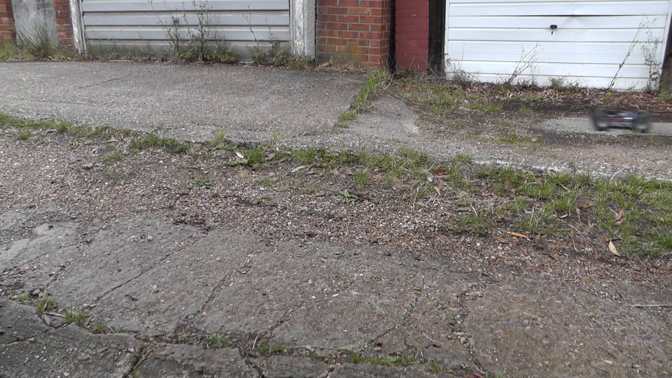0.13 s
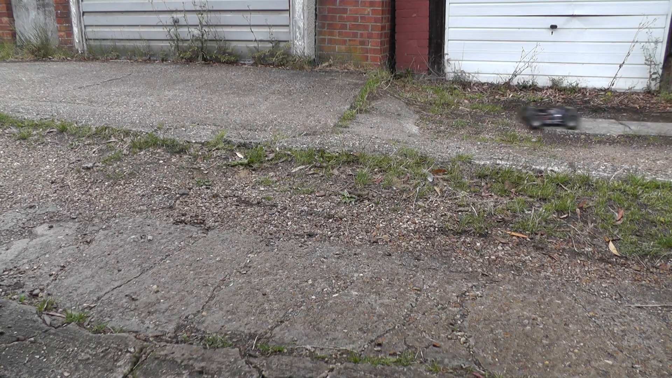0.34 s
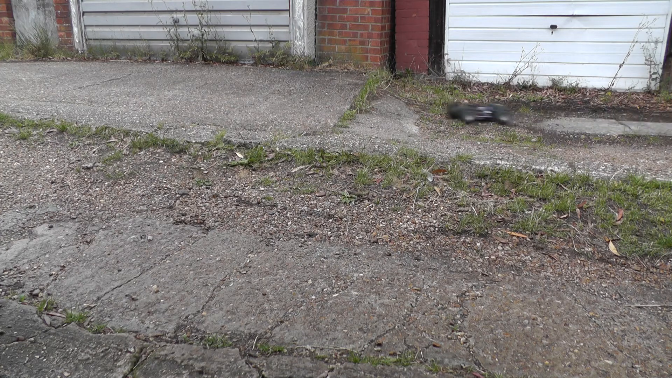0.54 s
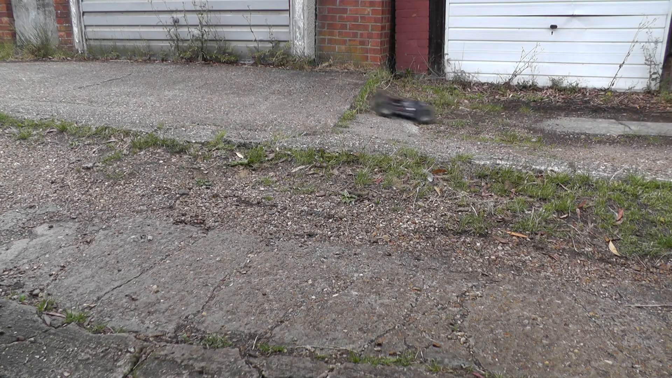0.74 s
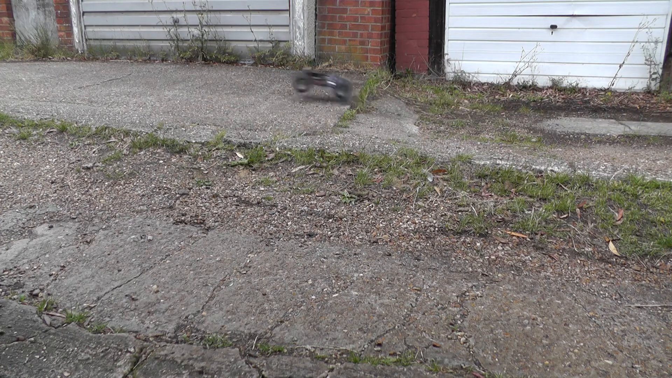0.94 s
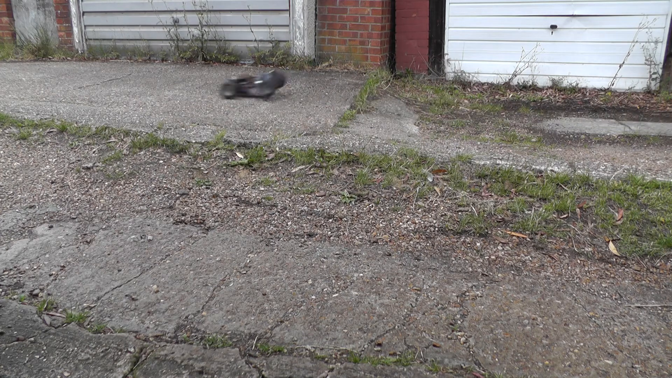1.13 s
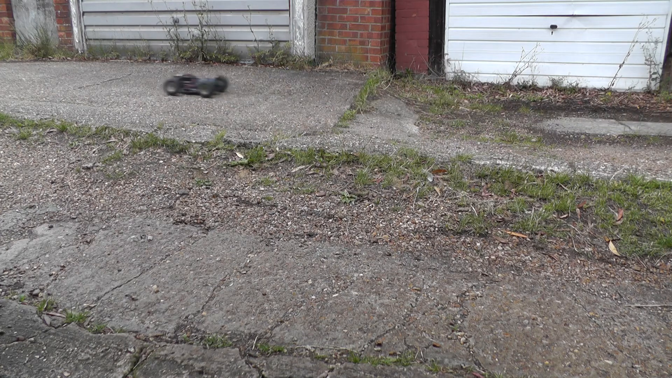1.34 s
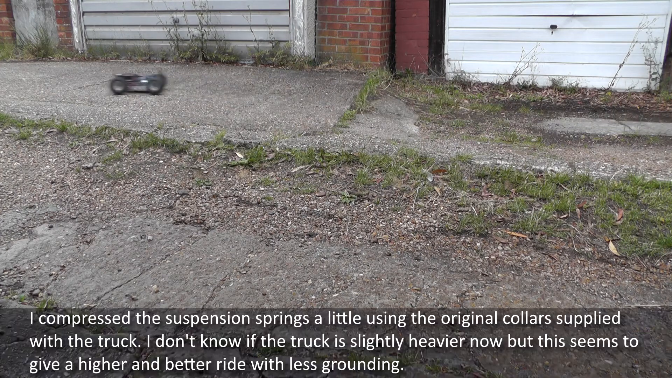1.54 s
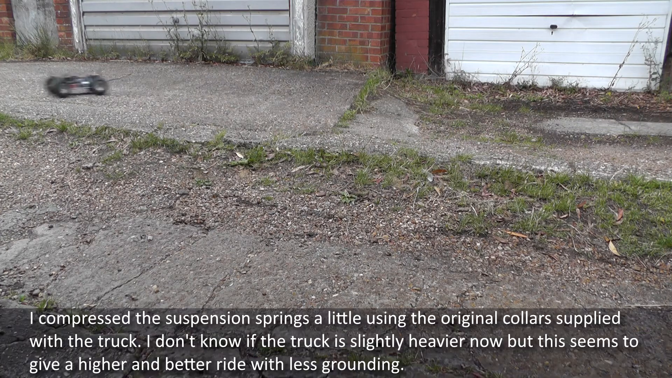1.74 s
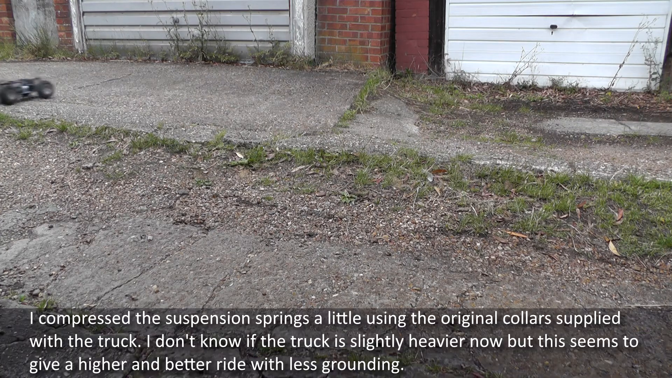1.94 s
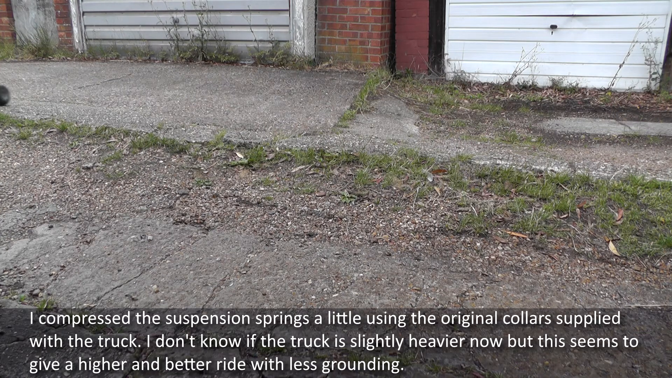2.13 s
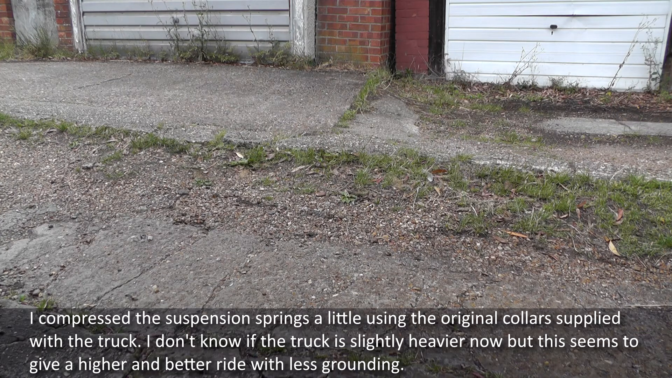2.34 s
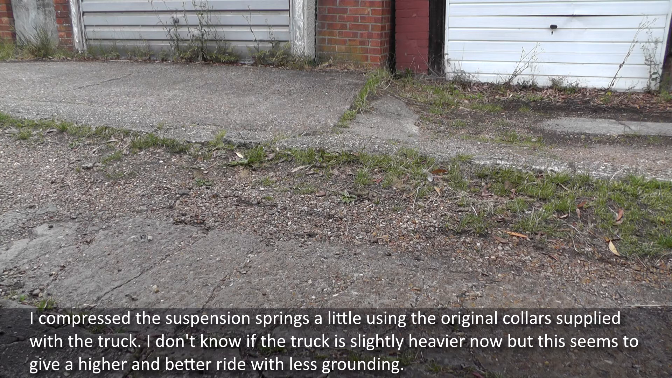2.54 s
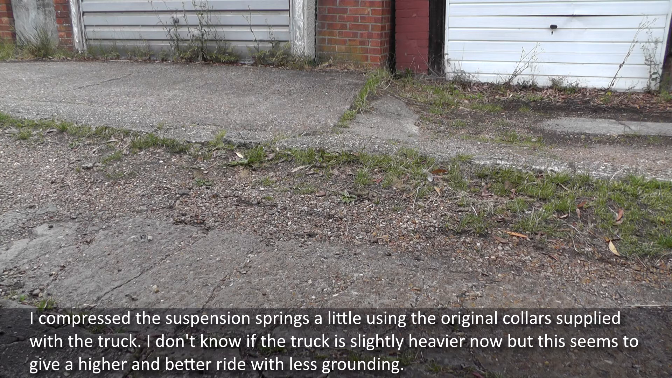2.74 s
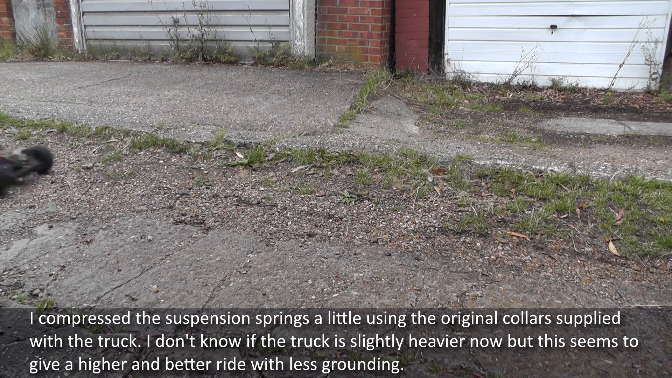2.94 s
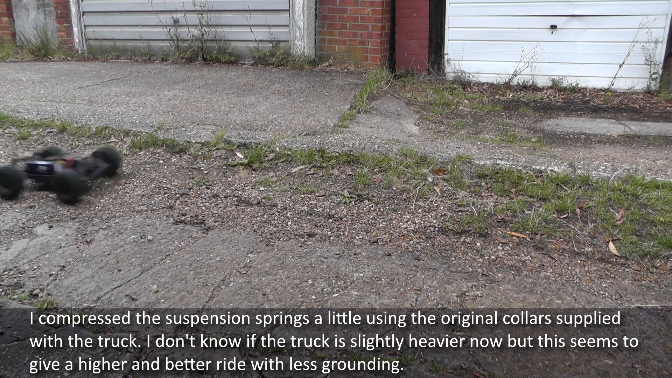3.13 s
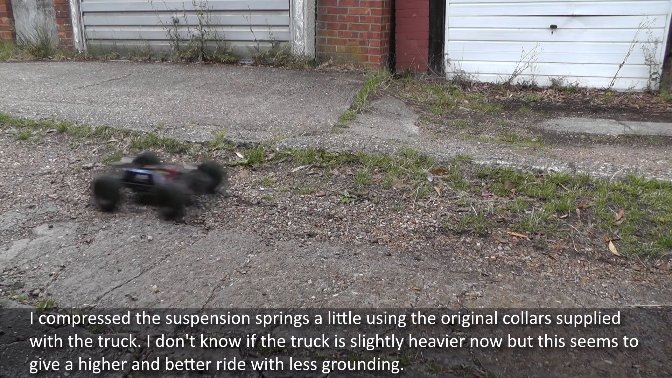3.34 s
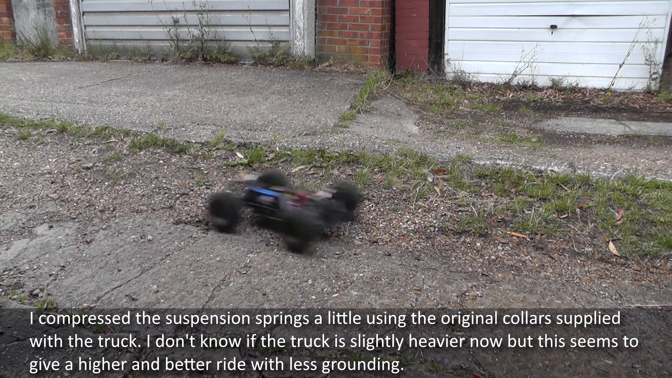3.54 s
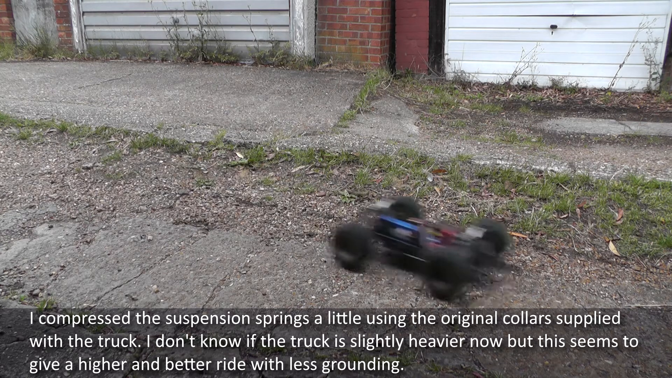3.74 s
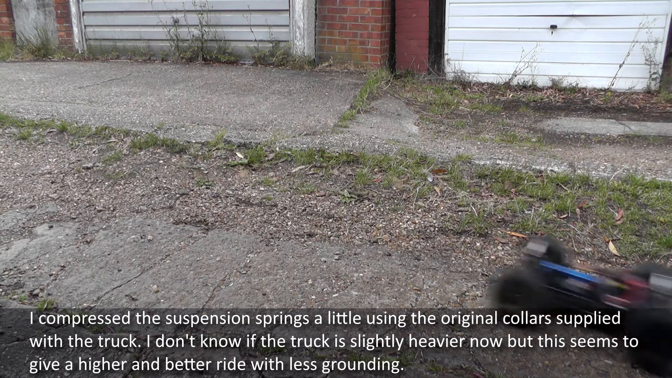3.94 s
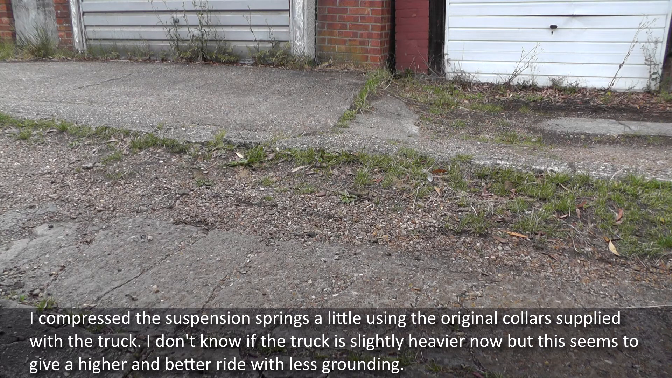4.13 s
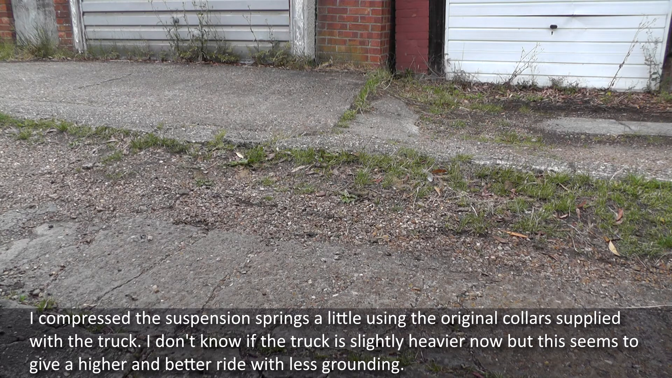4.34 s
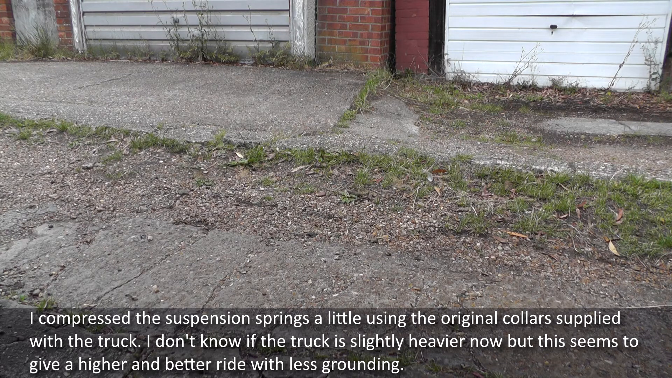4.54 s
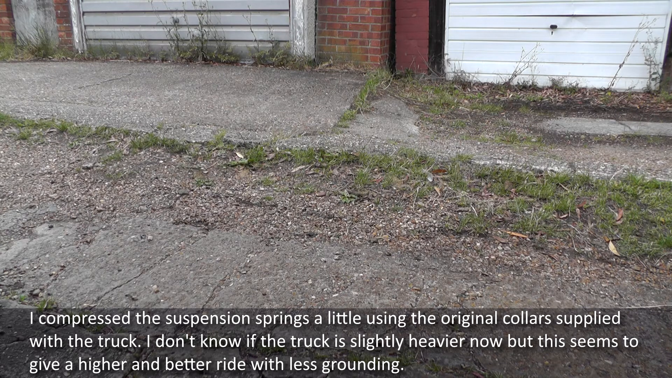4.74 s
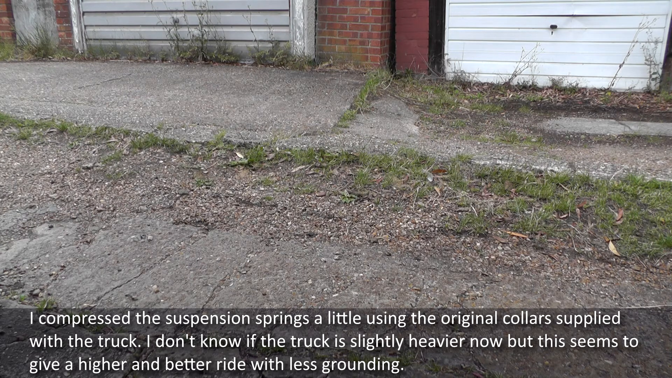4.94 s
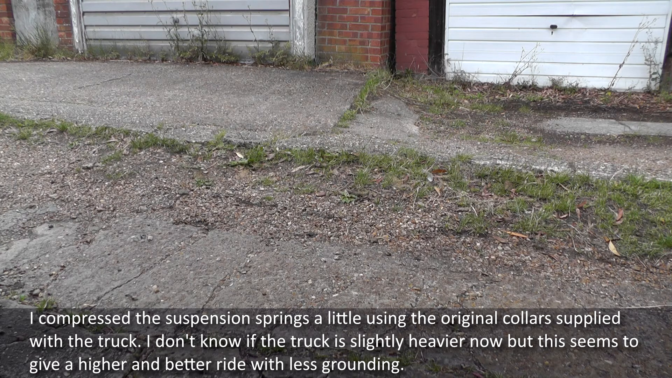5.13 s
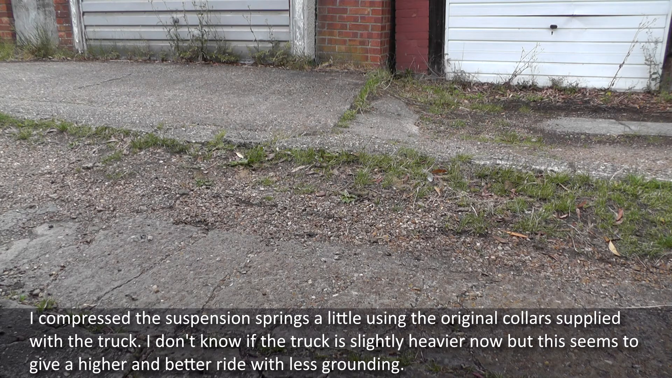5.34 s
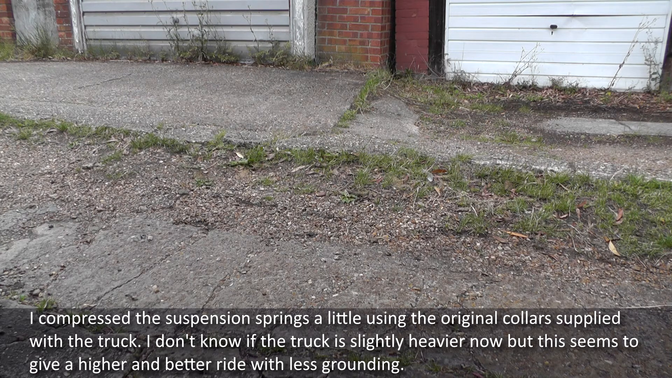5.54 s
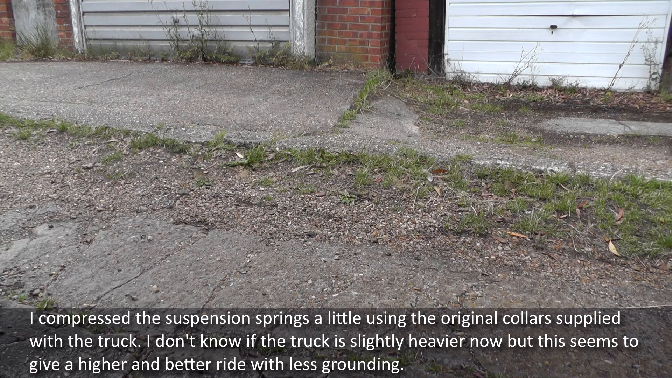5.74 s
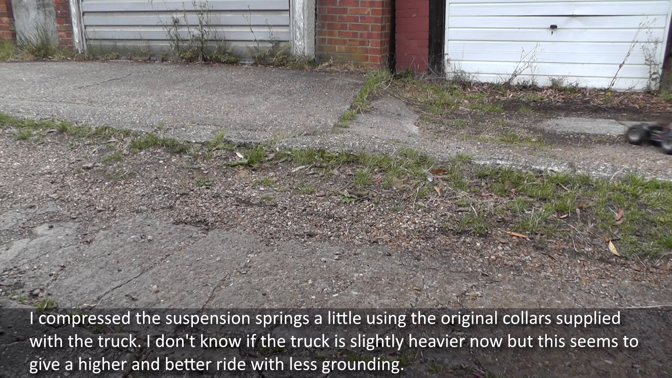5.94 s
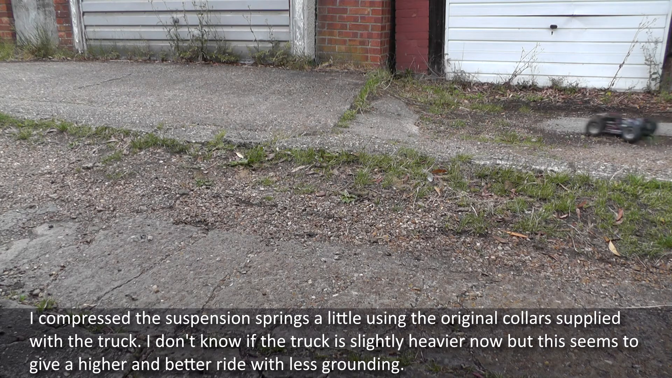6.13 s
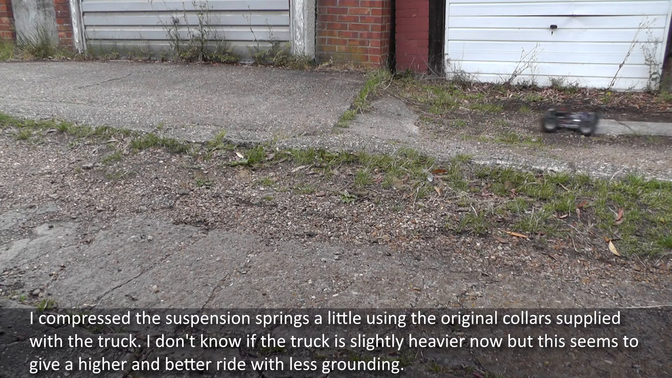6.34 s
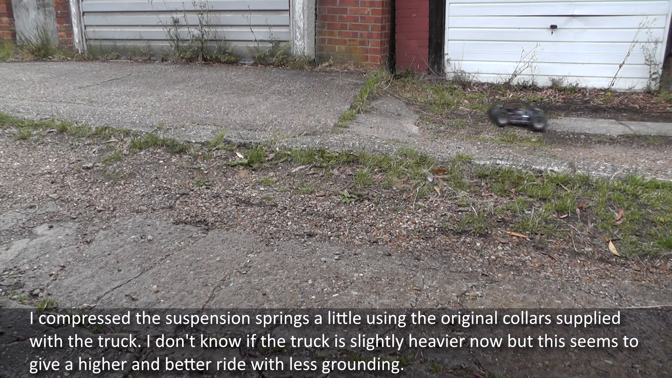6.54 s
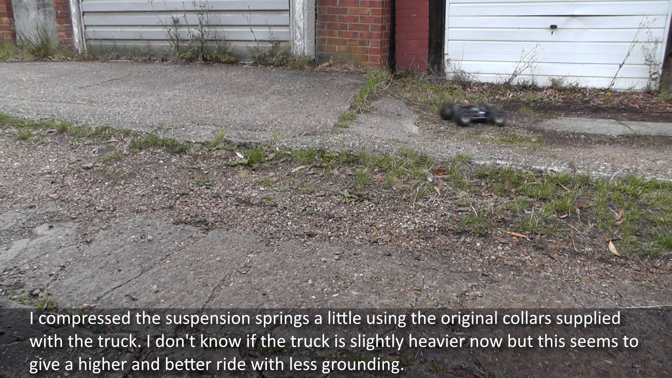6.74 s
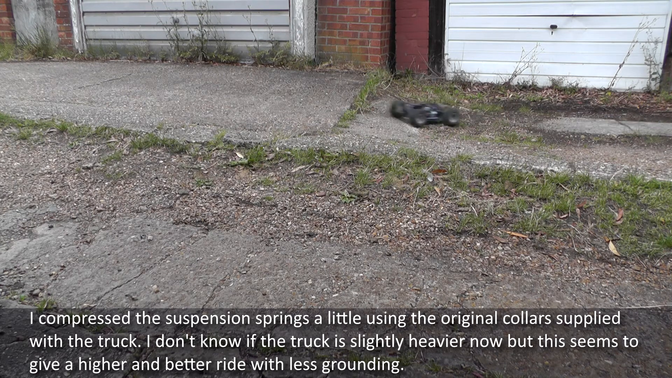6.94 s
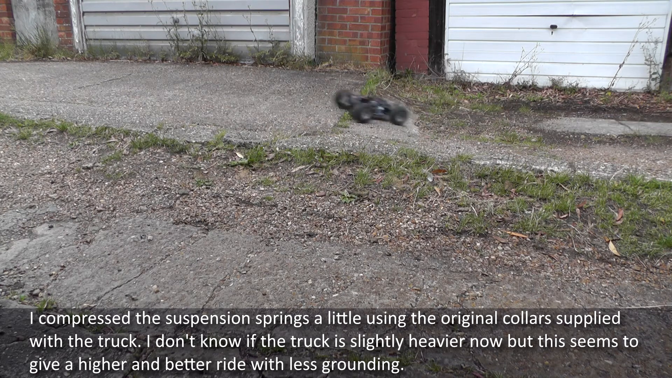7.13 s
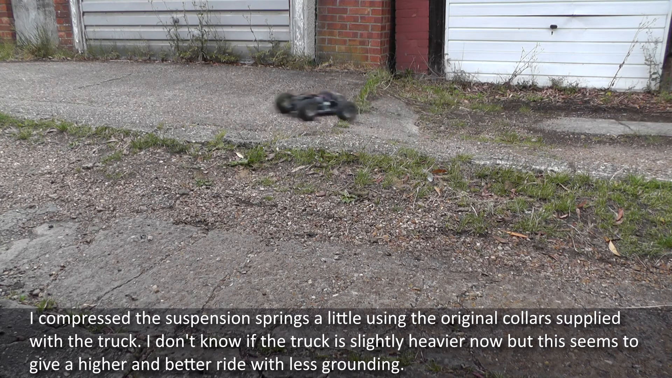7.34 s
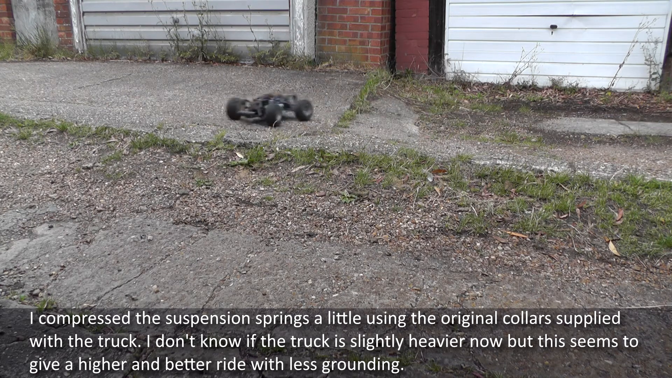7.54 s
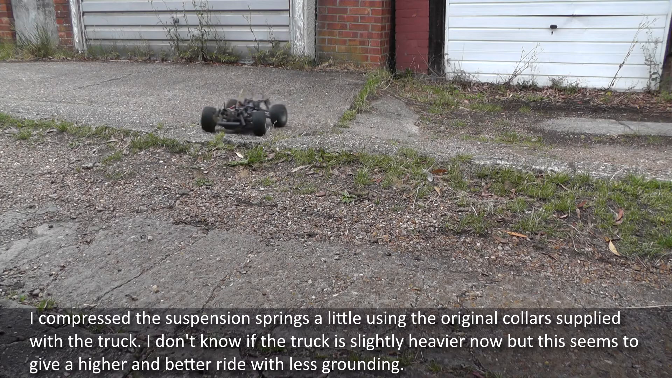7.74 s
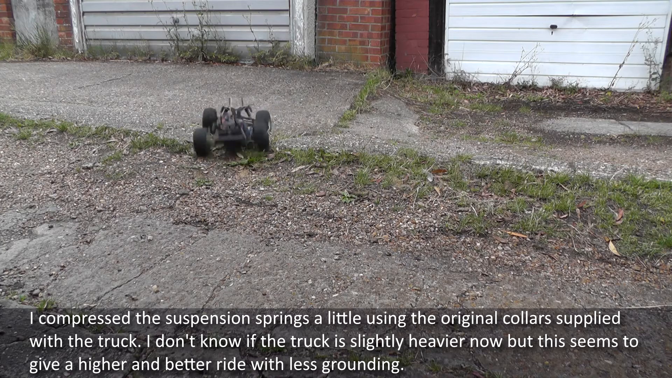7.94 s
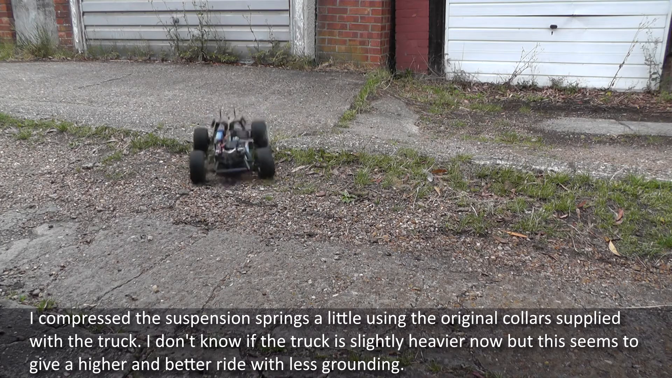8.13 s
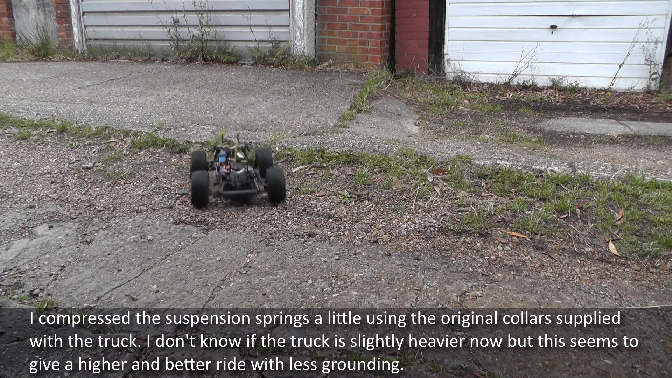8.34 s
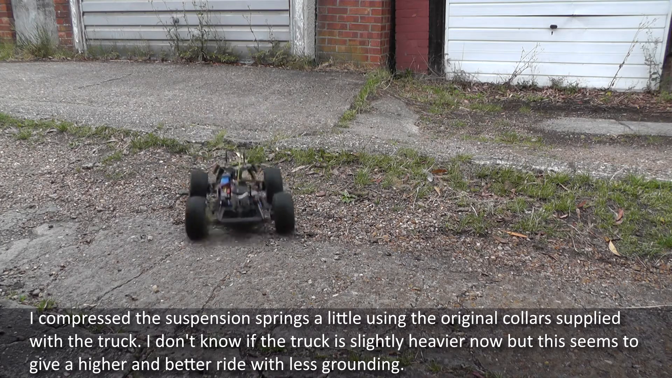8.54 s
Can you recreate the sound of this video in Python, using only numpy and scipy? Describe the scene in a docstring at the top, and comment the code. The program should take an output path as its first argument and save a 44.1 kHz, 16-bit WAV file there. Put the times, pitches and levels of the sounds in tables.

```python
"""A small electric radio-controlled truck drives laps over rough paving, heard in mono.
Its plastic gears whine at multiples of the tooth rate, rising and falling with the throttle.
Tyres and chassis rattle over grit: coloured, long-tailed noise grains under one set of bumps.
The speed controller sings near 10 kHz on part throttle; stones click and the chassis thuds as decaying bursts.
Distant traffic, a slowly swelling low noise, lies underneath."""
import sys
import numpy as np
from scipy import signal
from scipy.fft import rfft, irfft
from scipy.io import wavfile
from scipy.ndimage import uniform_filter1d, minimum_filter1d

SR = 44100
rng = np.random.default_rng(int(sys.argv[2]) if len(sys.argv) > 2 else 0)


def inscribe(sig):
    """Save sig as 16-bit PCM at rate SR to the path in sys.argv[1].

    A 1-D sig is mono; a 2-D sig holds one channel per row.
    Samples are clipped to [-1, 1] before scaling.
    """
    pcm = np.round(np.clip(np.atleast_2d(sig).T, -1, 1) * 32767)
    wavfile.write(sys.argv[1], SR, pcm.astype(np.int16))


N = 382339

# Speed controller on part throttle.
# Each row: start in seconds, end in seconds, level at the start in dB, level at the end in dB.
PART_THROTTLE = [(.04, .8, -58, -47), (.86, .99, -58, -58), (1.3, 1.47, -49, -50), (1.6, 1.81, -55, -54),
                 (1.93, 2.07, -54, -54), (2.3, 2.9, -58, -53), (3.12, 3.4, -46, -43),
                 (3.44, 3.88, -55, -49), (3.96, 4.32, -47, -54), (4.57, 4.68, -51, -50),
                 (4.83, 5.32, -53, -50), (5.39, 5.83, -53, -58), (6.08, 6.84, -58, -52),
                 (6.93, 8.14, -56, -60), (8.37, 8.67, -47, -51)]
# Resonances of the chassis. Each row: frequency in Hz, width in Hz, relative level in dB.
CHASSIS_MODES = [(317, 184, 4), (217, 305, -6.5), (502, 670, -2)]


def undb(db):
    """Decibels to an amplitude factor."""
    return 10 ** (np.asarray(db) / 20)


def unit(x):
    """Scale to an RMS of 1."""
    return x / np.sqrt(np.mean(np.abs(x) ** 2))


def curves(table):
    """Columns of a table after its time column, one value per sample."""
    s, *columns = np.transpose(table)
    return [np.interp(np.arange(N) / SR, s, c) for c in columns]


def walk(rate):
    """Random levels held 1 / rate seconds and slewed twice, with an RMS of 1."""
    hold = max(int(SR / rate), 2)
    steps = np.repeat(rng.standard_normal(N // hold + 1), hold)
    slewed = uniform_filter1d(uniform_filter1d(steps, hold), hold)
    return unit(slewed[:N])


def swell(start, end, rise_s, fall_s, first=1, last=1):
    """Zero, a rise to first, a slope to last, a fall to zero."""
    return np.interp(np.arange(N) / SR, [start - rise_s, start, end, end + fall_s], [0, first, last, 0])


def colour(x, points):
    """Shape x by a causal minimum-phase filter drawn through (Hz, dB) points, then scale it to RMS 1."""
    hz, db = np.transpose(points)
    bins_hz = np.arange(2049) * SR / 4096
    log_gain = np.interp(np.log(bins_hz + 1), np.log(hz), db) * np.log(10) / 20
    # folding the cepstrum onto positive time makes the filter causal
    cepstrum = irfft(log_gain)
    cepstrum[1:2048] *= 2
    cepstrum[2049:] = 0
    impulse = irfft(np.exp(rfft(cepstrum)))
    return unit(signal.fftconvolve(x, impulse)[:N])


def ring(x, hz, width_hz):
    """A two-pole resonance."""
    return signal.lfilter(*signal.iirpeak(min(hz, .45 * SR), hz / width_hz, fs=SR), x)


def grains(scatter_db, tail_s, most_db):
    """Noise whose samples have long-tailed sizes that die away over a short tail."""
    size = undb(np.minimum(scatter_db * rng.exponential(size=N), most_db))
    power = signal.lfilter([1], [1, -np.exp(-1 / (tail_s * SR))], size ** 2)
    return rng.standard_normal(N) * np.sqrt(power)


def driving():
    """Bumps in the paving shake gears, drivetrain, chassis and grit together."""
    # Rolling freely, nearer or farther. Each row: time in seconds, drivetrain gain in dB,
    # chassis rumble gain in dB, grit in dB relative to the drivetrain.
    lap = [(0, -27.5, -38.5, -9), (.45, -27.5, -32, -4.5), (.95, -24.5, -37, -6.5), (1.5, -30, -37, -12.5),
           (1.86, -31.5, -37, -13), (2.25, -36.5, -44, -8.5), (2.9, -31, -32, -8.5), (3.08, -30, -37, -9),
           (3.5, -22.5, -30.5, -11.5), (3.88, -19.5, -28.5, -12), (4.3, -24.5, -31.5, -11),
           (4.6, -33, -37.5, -13), (4.86, -33.5, -44.5, -11.5), (5.3, -32.5, -39.5, -15),
           (5.8, -32.5, -36.5, -11), (6.06, -33.5, -42, -7), (6.5, -28.5, -33.5, -9.5),
           (6.71, -31.5, -41, -9), (7.5, -28, -34.5, -7.5), (7.75, -32.5, -40, -8.5),
           (8.18, -32.5, -39, -13), (8.67, -28.5, -34, -9.5)]
    # Landings and bumps. Each row: start in seconds, time held in seconds,
    # drivetrain boost in dB, rumble boost in dB.
    jolt_rows = [(1.12, 0.011, 6, 13), (1.265, 0.0084, 10, 8), (2.346, 0.0067, 12.5, 2),
                 (2.95, 0.0092, 4, 3), (4.64, 0.057, 7.5, 4.5), (6.104, 0.0061, 11, 1),
                 (8.215, 0.064, 6, 5), (8.32, 0.082, 3.5, 0.5)]
    # Wheels off the ground. Each row: start in seconds, end in seconds.
    hops = [(1.041, 1.102), (1.195, 1.186)]
    # Colour of the loose drivetrain. Each row: frequency in Hz, relative density in dB per Hz.
    rattle_colour = [(250, -20.5), (450, -8.5), (1090, 4.5), (1500, 0.5), (2400, 0), (3900, -2),
                     (5000, -4.5), (7000, -16), (12000, -35)]
    # Colour of the tyres on grit. Each row: frequency in Hz, relative density in dB per Hz.
    grit_colour = [(4000, -6), (5500, 4), (6800, 0), (8600, 1.5), (9800, -10), (11000, -18), (12600, -16),
                   (14500, -22), (16000, -28)]
    # Lift of the grit's highest treble. Each row: time in seconds, level added in dB.
    top_lift = [(.2, -6), (.6, 3.5), (1.1, 0), (1.6, 10), (2.4, 0), (2.8, 7), (3.1, -4), (3.35, 6),
                (3.9, 4.5), (4.7, 4.5), (5.6, 7), (6.1, -2), (6.9, 2), (7.35, 5.5), (7.8, 2), (8.3, 10.5),
                (8.67, 5)]
    top_grit_hz = 10500
    jolt_rise_s, jolt_fall_s = 0.037, 0.051
    hop_slope_s, hop_db, hop_rumble_db = 0.034, -7, -13
    rumble_share, grit_share = 0.36, 0.46  # of the dB that a pull adds; jolts lift grit by this share too

    drive_db, rumble_db, grit_db = curves(lap)
    pull_db, tone_db = pulls()
    jolts = [swell(s, s + held, jolt_rise_s, jolt_fall_s) * np.array(dbs)[:, None]
             for s, held, *dbs in jolt_rows]
    jolt_db, jolt_rumble_db = sum(jolts)
    air = sum(swell(start, end, hop_slope_s, hop_slope_s) for start, end in hops)
    drive_db = drive_db + pull_db + jolt_db + hop_db * air
    rumble_db = rumble_db + rumble_share * pull_db + jolt_rumble_db + hop_rumble_db * air
    # grit also gets the drivetrain gain below, so take back what it does not share
    grit_db = grit_db - (1 - grit_share) * (pull_db + jolt_db)

    bumps = 0.52 * walk(25) + 1.15 * walk(70)
    rattle = colour(grains(4., .0013, 30.), rattle_colour) * undb(-3.5 + bumps)

    shake = grains(4.6, .004, 33.)
    modes = [undb(db) * ring(ring(shake, hz, width), hz, width) for hz, width, db in CHASSIS_MODES]
    rumble = unit(sum(modes)) * undb(rumble_db + 1.7 * bumps)

    grit = colour(grains(4.3, .001, 32.), grit_colour)
    highpass = signal.butter(4, top_grit_hz, "high", fs=SR, output="sos")
    top = signal.sosfiltfilt(highpass, grit)
    grit = grit + top * (undb(curves(top_lift)[0] + 2.0 * walk(5.4)) - 1)
    grit = grit * undb(grit_db + 0.86 * bumps + 1.1 * walk(13))

    whine = gears(tone_db) * undb(0.067 * bumps)
    return undb(drive_db) * (whine + rattle + grit) + rumble


def gears(tone_db):
    """Teeth mesh unevenly: speed wobbles, and each multiple flutters in size and phase; the motor can rings."""
    # Speed of the truck. Each row: time in seconds, tooth rate in Hz before the wobble.
    teeth = [(0, 988), (.3, 1106), (.47, 1220), (.58, 1215), (.68, 1340), (.78, 1353), (.825, 1483),
             (.865, 1390), (.93, 1590), (1.05, 1213), (1.31, 1035), (1.35, 1098), (1.385, 1062),
             (1.45, 1030), (1.64, 1300), (1.66, 1234), (1.705, 1323), (1.735, 1173), (1.79, 1053),
             (1.9, 936), (2.4, 823), (2.82, 890), (3.08, 998), (3.14, 1390), (3.2, 1092), (3.4, 1178),
             (3.7, 1077), (3.9, 1002), (4.07, 1034), (4.1, 932), (4.13, 1012), (4.27, 934), (4.9, 596),
             (4.98, 644), (5.07, 716.4), (5.33, 675), (5.41, 750), (5.48, 785), (5.53, 888), (5.57, 1020),
             (5.63, 1103), (6.16, 760), (6.22, 836), (6.255, 804), (6.3, 844), (6.35, 930), (6.49, 907),
             (6.74, 802), (6.82, 889), (6.89, 909), (6.93, 1007), (7.07, 1050), (7.15, 1041), (7.19, 976),
             (7.23, 1040), (7.28, 991), (7.31, 909), (7.52, 1128), (7.63, 1208), (7.69, 1135), (7.74, 1219),
             (7.85, 1200), (7.98, 1064), (8.04, 1190), (8.13, 1176), (8.5, 1223), (8.67, 1167)]
    # Every second tooth bites harder for a moment.
    # Each row: time in seconds, relative level in dB at half the tooth rate.
    half_rate = [(0, -19), (.55, -22), (.65, -7), (.78, -18), (.9, -45)]
    # Response of the gearbox. Each row: frequency in Hz, gain in dB.
    gearbox = [(600, -11), (850, -11.5), (1100, -6), (1450, -9.5), (2000, -10.5), (2700, -8), (3400, -6),
               (4300, -17.5), (5500, -7.5), (7500, -42)]
    can_hz, can_width_hz = 4200, 460
    fifth_db = -5.5  # multiple 5 against multiple 3
    coast_db = -8.5  # unloaded teeth are quieter
    wobble = .04  # share of the tooth rate, before clean meshing reduces it
    flutter_hz = 180  # per multiple
    patchy_db, smooth_hz = 2.8, 1000

    hz, = curves(teeth)
    first_db, second_db, third_db, fourth_db, can_db = tone_db
    # slow teeth stay in contact and sing clearer
    clean = 1.1 + 3 * np.clip(1 - hz / smooth_hz, 0, 1)
    phase = 2 * np.pi * np.cumsum(hz * (1 + wobble * walk(70) / (1 + clean))) / SR

    shake = rng.standard_normal(N)
    can = unit(ring(ring(shake, can_hz, can_width_hz), can_hz, can_width_hz))
    out = undb(can_db + patchy_db * walk(35)) * can

    box_hz, box_db = np.transpose(gearbox)
    levels = [(.5, *curves(half_rate))]
    stack = [first_db, second_db, third_db, fourth_db, third_db + fifth_db]
    for multiple, db in enumerate(stack, 1):
        levels.append((multiple, db + np.interp(multiple * hz, box_hz, box_db)))
    for multiple, db in levels:
        steady = clean / multiple ** 2  # higher multiples blur more
        blur = walk(flutter_hz * multiple) + 1j * walk(flutter_hz * multiple)
        flutter = (steady + blur) / np.sqrt(1 + steady ** 2 / 2)
        tone = np.real(flutter * np.exp(1j * multiple * phase))
        out = out + undb(db + patchy_db * walk(45)) * tone
    return out * undb(coast_db * (1 - throttle()))


def pulls():
    """The motor pulls: dB added to the drive, and levels of multiples and can, which leave idle meanwhile."""
    # Each row: full at in seconds, until in seconds, rise in seconds, fall in seconds,
    # dB above rolling at first, dB above rolling at last,
    # then the levels in dB of multiples 1, 2, 3 and 4 of the tooth rate and of the motor can.
    pull_rows = [(0.043, 0.33, 0.12, 0.079, -0.5, 3, 3.5, -7, -7, -8, -27),
                 (0.377, .56, 0.059, 0.051, 2, 4.5, 2, -14, -2, -2, -35),
                 (0.602, 0.856, 0.12, 0.16, 4, 7.5, 1, 0, -4, -8, -14),
                 (1.33, 1.402, 0.037, 0.086, 3.5, 4.5, -0.5, 4.5, 2.5, 5, -6.5),
                 (1.636, 1.72, 0.017, 0.053, 10.5, 9.5, 2.5, 2.5, -2, 0, -21),
                 (1.747, 1.799, 0.045, 0.034, 6, 6, 0.5, -18, -1.5, -10, -10),
                 (1.927, 2.032, 0.065, 0.14, 4, 7, -2.5, -7, -12, -10, -13),
                 (2.388, 2.621, 0.027, 0.066, 4, 4.5, -2, -8, -4, -12, -8),
                 (2.648, 2.804, 0.056, 0.096, 6, 11, -2, -18, -11, -14, -8.5),
                 (3.14, 3.211, 0.1, 0.092, 7, 10, -25, 1, -20, -10, -28),
                 (3.265, 3.409, 0.061, 0.072, 8, 7, -1.5, 2, -14, -2, -22),
                 (3.66, 3.727, 0.23, 0.06, -2, 1.5, -10, -6, -20, -21, -36),
                 (4.024, 4.106, 0.12, 0.034, 2, 5, 5, -0.5, -10, 5, -11),
                 (4.117, 4.22, 0.04, 0.081, 4, 0, -2.5, 4, -2, -15, -33),
                 (4.938, 5.019, 0.09, 0.068, 4, 4.5, -2, 1, -8, 4, -28),
                 (5.04, 5.215, 0.072, 0.085, 5.5, 6, 2.5, -7, -11, -7, -14),
                 (5.295, 5.426, .04, 0.076, 0, 1.5, 0.5, 1, -3, -5, -12),
                 (5.505, 5.629, 0.12, 0.12, 4, 7.5, 1.5, -3, -9, -1, -16),
                 (6.197, 6.294, 0.1, 0.039, 1, 3, 4.5, -2, 2.5, -8, -26),
                 (6.368, 6.419, 0.053, 0.21, 6, 1.5, 0.5, -4, -5, -5, -29),
                 (6.804, 6.95, 0.11, 0.11, 5.5, 7.5, 1.5, -2.5, -3, -21, -40),
                 (6.983, 7.194, 0.11, 0.056, 8, 4.5, 4, -1, -3.5, 2, -11),
                 (7.245, 7.297, 0.047, 0.044, 4, 3, 0, 5, 1, 0, -28),
                 (7.564, 7.836, 0.071, 0.082, -1.5, 1.5, -4, -30, 0, -10, -11),
                 (8.018, 8.136, 0.14, 0.045, 7, 8, 4, 3.5, -13, -18, -10),
                 (8.419, 8.52, 0.011, 0.063, 11.5, 6, 0, 3, -10, -12, -9.5),
                 (8.588, 8.701, 0.093, 0.053, 4, 1, 0, 2, -1, -6, -11)]
    # Levels between pulls, in dB: multiples 1, 2, 3 and 4, then the motor can.
    idle_levels = (-9.5, -8, -6, -15, -37)
    shares = np.array([swell(*row[:4]) for row in pull_rows])
    shares = shares / np.maximum(shares.sum(axis=0), 1)  # overlapping pulls share the weight
    added_db = np.max([swell(*row[:6]) for row in pull_rows], axis=0)
    idle = np.array(idle_levels)[:, None]
    pulled = np.array(pull_rows)[:, 6:].T
    return added_db, idle + (pulled - idle) @ shares


def throttle():
    """1 under power, 0 when coasting; short pauses of the switching tone are full throttle."""
    t, hold = np.arange(N) / SR, int(.11 * SR)
    on = sum(((t >= row[0]) & (t < row[1])) * 1. for row in PART_THROTTLE)
    widened = -minimum_filter1d(-on, hold)
    bridged = minimum_filter1d(widened, hold)
    return uniform_filter1d(bridged, int(0.021 * SR))


def via_ground(x):
    """Reflection off the paving cancels a band of treble, hollowing it when the truck is on the far lane."""
    # Each row: time in seconds, depth of the hollow from 0 to 1.
    hollow = [(0, 0.57), (.8, 0.67), (1.4, 0.35), (1.7, 0.12), (5.5, 0.06), (5.9, 0.48), (6.75, 0.74),
              (7.0, 0.38), (7.4, 0.46), (8.0, 0.16), (8.67, 0.34)]
    centre_hz, width_hz = 6100, 5000
    depth, = curves(hollow)
    return x - np.clip(depth, 0, .95) * ring(x, centre_hz, width_hz)


def switching():
    """The windings sing at the chopping rate, shifted a little by the motion (Doppler)."""
    # Each row: time in seconds, speed towards the microphone in metres per second.
    approach = [(0, 0), (.8, .9), (1, -.4), (1.47, -1.2), (1.8, .3), (2.3, 1.2), (3.42, 1.6), (3.9, .5),
                (4.32, -1.9), (4.85, -.9), (5.8, -1.3), (6.1, -.7), (7, 1.2), (8.67, 1.7)]
    chop_hz, sound_m_s = 9890, 343
    t, gain = np.arange(N) / SR, np.zeros(N)
    for start, end, *db in PART_THROTTLE:
        on = (t >= start) & (t < end)
        gain[on] = undb(np.interp(t[on], [start, end], db))
    hz = chop_hz * (1 + curves(approach)[0] / sound_m_s)
    gain = uniform_filter1d(gain, int(.035 * SR)) * np.sqrt(2)  # table levels are RMS
    gain = gain * undb(3 * walk(16) + 2.2 * walk(45))
    return gain * np.sin(2 * np.pi * np.cumsum(hz + 8.3 * walk(40)) / SR)


def knocks():
    """Each stone or knock is a broad crack of noise around its own colour, with a short tail."""
    # Each row: start in seconds, peak level in dB, centre in Hz.
    knock_rows = [(.964, -20, 8760), (1.101, -14.5, 880), (1.125, -12.5, 1990), (1.139, -14, 7500),
                  (1.259, -18, 9000), (1.507, -17, 4050), (1.641, -11, 1310), (1.837, -11, 890),
                  (1.856, -18, 5000), (1.949, -15, 1207), (2.334, -15, 5000), (2.925, -16.5, 5150),
                  (2.96, -17.5, 5490), (3.468, -7, 1101), (3.634, -6, 450), (3.76, -17, 12000),
                  (3.809, -9, 1500), (4.008, -13, 2000), (4.192, -9, 900), (4.265, -10, 1320),
                  (4.631, -12, 2996), (4.705, -27, 9070), (4.808, -16, 6240), (6.1, -19, 2402),
                  (6.102, -15, 1202), (7.305, -26, 8650), (7.73, -19.5, 797.6), (8.213, -9, 2150),
                  (8.256, -21, 8550), (8.414, -7.5, 4480), (8.557, -12.5, 5540)]
    crack_s, tail_s, tail_db = .002, .009, -8
    dull = .7  # one-pole lowpass coefficient
    out, t = np.zeros(N + 4096), np.arange(4096) / SR
    envelope = np.exp(-t / crack_s) + undb(tail_db) * np.exp(-t / tail_s)
    for s, db, hz in knock_rows:
        noise = rng.standard_normal(len(t))
        noise[0] = 6  # the first contact is a sharp tick
        body = 0.023 * signal.lfilter([1], [1, -dull], noise)
        burst = (ring(noise, hz, 0.26 * hz) + body) * envelope
        out[int(s * SR):][:len(t)] += undb(db) * burst / np.abs(burst).max()
    return out[:N]


def thuds():
    """The chassis bottoms out on the close pass: a soft push rings its modes."""
    # Each row: start in seconds, peak level in dB.
    thud_rows = [(3.144, -27), (3.201, -24), (3.294, -20), (3.404, -21), (3.494, -17.5), (3.594, -19),
                 (3.654, -23), (3.686, -19.5), (3.755, -21)]
    push_s, t60_s = .004, 0.054  # onset time constant, time to decay by 60 dB
    out, t = np.zeros(N + 4096), np.arange(4096) / SR
    for s, db in thud_rows:
        detune = 1 + .08 * rng.standard_normal()
        modes = sum(undb(gain_db) * np.sin(2 * np.pi * hz * detune * t) for hz, _, gain_db in CHASSIS_MODES)
        burst = modes * (1 - np.exp(-t / push_s)) * undb(-60 * t / t60_s)
        out[int(s * SR):][:len(t)] += undb(db) * burst / np.abs(burst).max()
    return out[:N]


def traffic():
    """A low distant rumble of coloured noise that swells slowly."""
    # Each row: frequency in Hz, relative density in dB per Hz.
    traffic_colour = [(20, -19), (40, -11), (60, -2), (120, -3.5), (250, -5.5), (500, -24), (900, -40)]
    middle_db, swell_db = -50, 3.0
    return colour(rng.standard_normal(N), traffic_colour) * undb(middle_db + swell_db * walk(1.596))


def scene():
    """The truck, with its driving noise hollowed by the paving, over the traffic."""
    truck = via_ground(driving()) + switching() + knocks() + thuds()
    return (truck + traffic())[None]


def record(dry):
    """The recorder cuts the top with a steep elliptic lowpass."""
    top_hz = 15750
    lowpass = signal.ellip(10, .2, 70, top_hz, fs=SR, output="sos")
    return signal.sosfilt(lowpass, dry)


dry = scene()
out = record(dry)
inscribe(out)
```